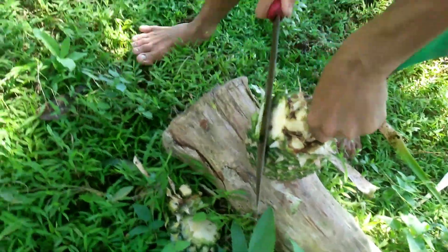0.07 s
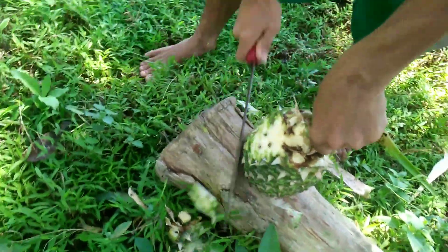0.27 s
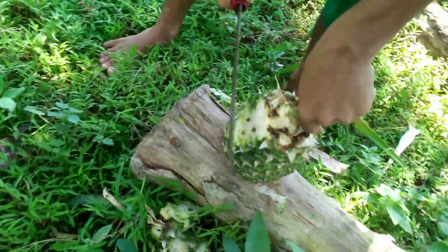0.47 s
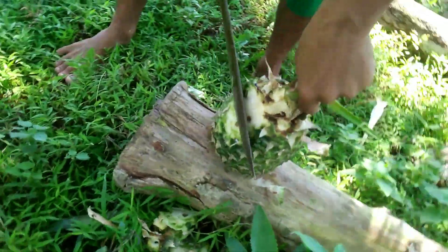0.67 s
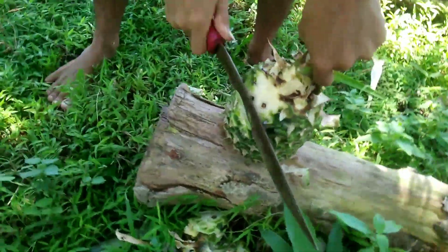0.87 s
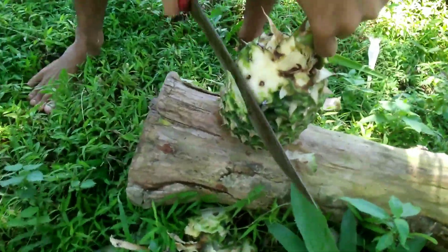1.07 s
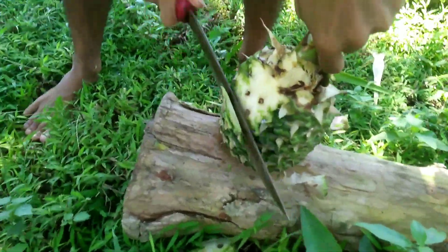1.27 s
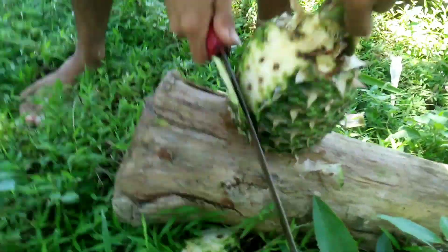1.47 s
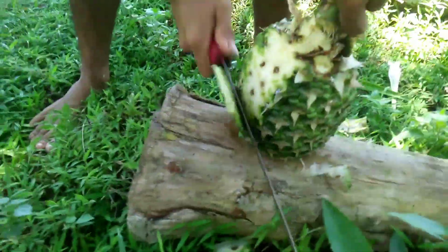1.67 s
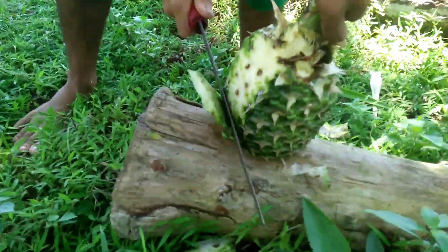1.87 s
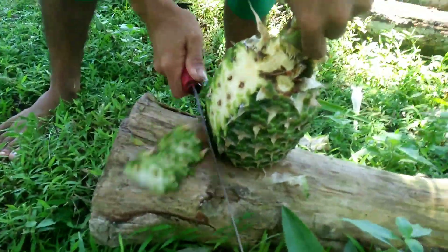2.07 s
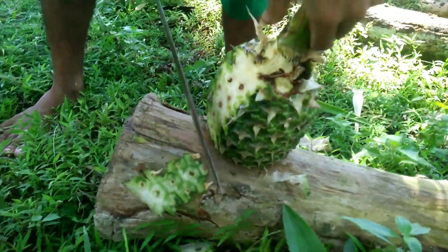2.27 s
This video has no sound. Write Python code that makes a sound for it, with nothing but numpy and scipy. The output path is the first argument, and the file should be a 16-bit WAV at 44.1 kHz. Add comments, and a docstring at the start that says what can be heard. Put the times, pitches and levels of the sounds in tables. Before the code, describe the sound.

Blade chopping and paring fibrous fruit rind on a wooden log, with crisp snaps and woody knocks

```python
"""Paring a pineapple with a machete

A machete pares the rind off a pineapple that stands on a log in the grass, close by.
The blade rasps through wet fibres (dense tiny clicks), snaps the tough ones (short bursts) and rings
faintly (fading tones). Twice it breaks through and chops into the log: a push, a bite, a thud, a crack
and ringing wood. Fainter knocks on the log, a soft rustle and a low rumble complete the scene."""
import sys
import numpy as np
from scipy import signal
from scipy.fft import rfft, irfft
from scipy.io import wavfile
from scipy.ndimage import uniform_filter1d

SR = 44100
rng = np.random.default_rng(int(sys.argv[2]) if len(sys.argv) > 2 else 0)


def output_pcm(signal):
    """Save a mono or channel-first signal as 16-bit PCM at the path in sys.argv[1].

    Samples are clipped to [-1, 1] before scaling.
    """
    pcm = np.clip(np.atleast_2d(signal).T, -1, 1) * 32767
    wavfile.write(sys.argv[1], SR, np.round(pcm).astype(np.int16))


N = 101429  # length in samples, about 2.3 s


def amp(db):
    """Turns decibels into a plain gain."""
    return 10 ** (np.asarray(db) / 20)


def unit(x):
    """Scales a sound to rms 1."""
    return x / np.sqrt(np.mean(x ** 2) + 1e-20)


def add(mix, s, sound):
    """Lays a sound into the mix, starting at s seconds."""
    part = mix[max(round(s * SR), 0):][:len(sound)]
    part += sound[:len(part)]


def colour(x, points, bump=lambda hz: 0):
    """Gives noise the spectrum drawn by the points, plus an optional bump in dB, at rms 1."""
    hz = np.fft.rfftfreq(len(x), 1 / SR) + 1  # + 1 avoids log(0)
    f, db = np.transpose(points)
    gain = amp(np.interp(np.log(hz), np.log(f), db) + bump(hz))
    return unit(irfft(rfft(x) * gain, len(x)))


def level_curve(points):
    """Draws a gain over the whole scene through (t/s, level/dB) points."""
    return amp(np.interp(np.arange(N) / SR, *np.transpose(points)))


FIBRES_PER_S, FIBRE_SPREAD_DB = 7000, 2.5


def fibres(count):
    """Dense tiny clicks of uneven size and random sign: fibres parting under the edge."""
    size = amp(FIBRE_SPREAD_DB * np.minimum(rng.exponential(1, count), 4))
    sign = rng.choice([-1, 1], count)
    return size * sign * (rng.random(count) < FIBRES_PER_S / SR)


# how loud the low rumble is over time: (t/s, level/dB)
RUMBLE_LEVEL = [(0, -70.5), (.13, -74), (.23, -52), (.33, -68), (.48, -65.5), (.57, -70.5), (.76, -67.5),
                (.87, -70), (.98, -61.5), (1.06, -65.5), (1.15, -62), (1.35, -76), (1.52, -68),
                (1.66, -78.5), (1.79, -66.5), (1.93, -77.5), (2.02, -68), (2.12, -72.5), (2.3, -72)]
# tone colour of the rumble: (f/Hz, level/dB)
RUMBLE_SPECTRUM = [(20, -19), (45, -6.5), (75, 0.5), (130, -1.5), (200, -15), (400, -32), (1500, -65.5)]


def rumble():
    """Low rumble at the microphone: deep noise that rises and falls."""
    return level_curve(RUMBLE_LEVEL) * colour(rng.standard_normal(N), RUMBLE_SPECTRUM)


# how loud the leaves and grass are over time: (t/s, level/dB)
RUSTLE_LEVEL = [(0, -61.5), (.17, -64.5), (.3, -54.5), (.56, -64), (1.0, -63), (1.37, -68.5), (1.59, -67),
                (1.65, -76.5), (1.72, -66), (1.87, -72), (1.98, -74.5), (2.09, -67), (2.14, -79),
                (2.19, -67.5), (2.3, -68.5)]
# tone colour of the rustle: (f/Hz, level/dB)
RUSTLE_SPECTRUM = [(100, -11), (500, -8.5), (1100, -9), (2200, -5), (3400, -4.5), (4800, 2), (5950, 2),
                   (6500, -12), (8000, -14.5), (12000, -15.5), (14500, -28.5)]


def rustle():
    """Soft rustle of leaves and grass: many tiny clicks blended with smooth noise."""
    grains = fibres(N) + .5 * rng.standard_normal(N)
    return level_curve(RUSTLE_LEVEL) * colour(grains, RUSTLE_SPECTRUM)


# blade or fruit meets the log:
# (t/s, level/dB, pitch factor, contact time/s, splinter crack level/dB, ring length factor)
CHOPS = [(.2408, -0.7, 1.0, .0001, -16, 1.0), (.5960, -53, .7, .0003, -12, 1.0),
         (.8600, -36, 1.04, .00014, -10, 1.1), (1.2995, -40, 1.65, .00028, -22, .8),
         (1.4280, -57, .54, .0005, -20, 1.0), (2.0356, -11, .935, .00021, -25, .8)]
# ways the log rings with the blade in it, before the factors of each chop:
# (f/Hz, level/dB, time to fade by 60 dB/s)
LOG_MODES = [(170, -29, .06), (250, -28, .08), (312, -23, .075), (428, -18, .06), (512, -6, .031),
             (653, -11, .042), (852, -25, .035), (1065, -21, .029), (1453, -4, .007), (1814, -22, .023),
             (2230, -13, .022), (2476, -13, .009), (2946, -16, .012), (4267, -26, .05)]
# tone colour of cracking wood: (f/Hz, level/dB)
CRACK_SPECTRUM = [(200, -13.5), (700, -7.5), (1100, -1.5), (1650, -5.5), (2300, 0), (3300, -6),
                  (4200, -5.5), (5800, -7), (7000, -10.5), (10000, -16.5), (14500, -36.5)]
PUSH_S, PUSH_DB = .000346, -4  # the width is divided by the pitch factor
BITE_DELAY_S, BITE_DB = .00035, -8
THUD_HZ, THUD_DB, THUD_PEAK_S = 78, -31.5, .0073
BUILD_CYCLES = 1.6  # each ring swells over about this many cycles of its unscaled pitch
CRACK_RISE_S, CRACK_DECAY_S = .0003, .003
SPLINTER_DB, SPLINTER_DECAY_S = -16, .012  # weaker, longer tail of the crack


def pulse(u):
    """A single push with a dip on either side, as the wood gives and springs back."""
    return (1 - u ** 2) * np.exp(-u ** 2 / 2)


def log_ring(after, pitch, contact, length):
    """The log's modes swell and die away; a longer contact excites the high ones less."""
    ring = 0
    for hz, level, t60 in LOG_MODES:
        decay = amp(level - 60 * after / (t60 * length))
        softness = 1 + (2 * hz * contact) ** 2
        build = 1 - np.exp(-(after * hz / BUILD_CYCLES) ** 2)
        ring = ring + decay / softness * np.cos(2 * np.pi * hz * pitch * after) * build
    return ring


def chops():
    """Each blow pushes the log, bites into it, thuds on the ground, and leaves wood ringing and cracking."""
    out = np.zeros(N)
    t = np.arange(-SR // 200, SR // 5) / SR  # starts 5 ms early, to hold the front of the push
    after = np.maximum(t, 0)
    for s, db, pitch, contact, crack_db, length in CHOPS:
        push = amp(PUSH_DB) * pulse(t * pitch / PUSH_S)
        bite = amp(BITE_DB) * pulse((t - BITE_DELAY_S) / contact)
        swell = np.exp(-(after / THUD_PEAK_S - 1) ** 2)
        thud = amp(THUD_DB) * np.sin(2 * np.pi * THUD_HZ * after) * swell
        ring = log_ring(after, pitch, contact, length)
        fade = np.exp(-after / CRACK_DECAY_S) + amp(SPLINTER_DB) * np.exp(-after / SPLINTER_DECAY_S)
        fade *= np.minimum(after / CRACK_RISE_S, 1)
        crack = amp(crack_db) * fade * colour(rng.standard_normal(len(t)), CRACK_SPECTRUM)
        add(out, s + t[0], amp(db) * (push + bite + thud + ring + crack))
    return out


# bundles of rind fibre snap:
# (t/s, level/dB, rise/s, decay/s, centre f/Hz, blade ring level against the tear/dB)
SNAPS = [(.2110, -28.5, 0.0004, 0.0045, 3430, -26), (.2180, -19, 0.00035, 0.0044, 3760, -22),
         (0.2234, -36, 0.0005, 0.012, 4400, -14), (0.312, -48, 0.00064, 0.0035, 3730, -19),
         (0.344, -42, .0008, 0.0047, 3780, -25), (0.462, -43, .003, 0.006, 5000, -20),
         (0.4864, -43.5, .0005, 0.0026, 4840, -7.5), (0.5042, -41, .0005, .003, 4880, -30.5),
         (0.7691, -54.5, 0.00075, 0.0029, 4220, -31), (0.8344, -45.5, .002, 0.0028, 4200, -13.5),
         (0.869, -62.5, 0.0018, 0.01, 4800, 5.5), (.9300, -55.5, 0.00051, 0.0057, 5740, 14.5),
         (0.964, -47, 0.0012, 0.0093, 5200, -7), (.9790, -41, 0.0037, 0.0067, 5630, -1),
         (.9855, -32.5, 0.00052, 0.0042, 5370, -12.5), (0.9946, -22, 0.00091, 0.00084, 5600, -36),
         (0.9979, -38, .001, 0.0029, 5570, -14), (1.0010, -33, 0.00014, 0.0012, 5600, -17),
         (1.02, -48.5, 0.00067, .002, 4740, -25), (1.1202, -29.5, 0.00036, 0.0011, 5400, -32),
         (1.122, -42, 0.00058, 0.004, 5130, -39), (1.1452, -34.5, .0004, .002, 5500, -31),
         (1.1809, -47, 0.00053, 0.0057, 4650, -30), (1.2025, -51, .0005, .002, 3800, -16),
         (1.2415, -68, .001, .003, 4570, -25), (1.281, -48, 0.0035, 0.018, 4900, -30.5),
         (1.297, -41.5, .0005, 0.0034, 5030, -29), (1.3892, -54, 0.00051, 0.0054, 5070, -27),
         (1.7450, -51, 0.0015, 0.0043, 4246, -28), (1.8291, -46.5, 0.00054, .002, 4510, -33),
         (2.0138, -48.5, 0.0028, 0.0043, 4720, -24), (2.0285, -35, 0.0061, 0.008, 4860, -25)]
# tone colour of a snap, before the peak at its centre: (f/Hz, level/dB)
SNAP_SPECTRUM = [(100, -13), (500, -11.5), (1100, -7.5), (1900, -11), (2700, -1.5), (5000, -3.5),
                 (6300, -3), (7200, -8.5), (10000, -11.5), (12000, -17.5), (14500, -24)]
# ways the steel blade rings: (f/Hz, level against each other/dB, time to fade by 60 dB/s)
BLADE_MODES = [(6030, -15.5, 0.014), (7970, -7.5, .022), (9880, 2.5, 0.024), (13100, 0, .025),
               (14150, -2.5, .02)]
PEAK_DB, PEAK_OCTAVES = 9, .34  # height and width of the peak at the centre frequency
TAIL_DB, TAIL_DECAY_S = -27.5, .012
SNAP_HISS = .4  # smooth noise among the single fibres


def snaps():
    """A bundle of fibres tears in a short burst and makes the steel blade ring."""
    out, t = np.zeros(N), np.arange(SR // 10) / SR
    steel = sum(amp(db - 60 * t / t60) * np.sin(2 * np.pi * hz * t) for hz, db, t60 in BLADE_MODES)
    for s, db, rise, decay, centre, ring_db in SNAPS:
        def peak(hz):
            """Lifts the frequencies near the centre of this snap, in dB."""
            return PEAK_DB * np.exp(-.5 * (np.log2(hz / centre) / PEAK_OCTAVES) ** 2)

        late = np.maximum(t - rise, 0)
        shape = np.exp(-late / decay) + amp(TAIL_DB) * np.exp(-late / TAIL_DECAY_S)
        shape *= np.minimum(t / rise, 1)
        grains = fibres(len(t)) + SNAP_HISS * rng.standard_normal(len(t))
        tear = shape * colour(grains, SNAP_SPECTRUM, peak)
        ring = unit(signal.fftconvolve(tear, steel)[:len(t)])
        strength = amp(db) * np.sqrt(np.mean(shape ** 2))  # a shorter burst carries less energy
        add(out, s, strength * (unit(tear) + amp(ring_db) * ring))
    return out


# slicing strokes:
# (start t/s, length/s, mid-stroke level/dB, swell over the stroke/dB, spray level against the rasp/dB)
STROKES = [(0, 0.028, -57, -20, -5.5), (0.017, 0.077, -61.5, -4.5, -15), (0.196, 0.023, -47, 22, -5),
           (0.316, 0.064, -54, 6.5, -6.5), (0.384, 0.12, -51.5, 4.5, -2.5), (0.583, 0.15, -59, -3, -10.5),
           (0.763, 0.025, -53.5, -12, -24.5), (0.825, 0.016, -47, 1.5, -13.5), (0.85, 0.12, -64, 5, -5),
           (0.985, 0.085, -57, -11, -7.5), (1.08, 0.041, -57.5, -13.5, -14),
           (1.115, 0.064, -54.5, -2.5, -7), (1.168, 0.089, -51, -8, -8.5), (1.273, 0.082, -59, -11, -12.5),
           (1.382, 0.099, -62, 2.5, -12), (1.544, 0.063, -67.5, -5, -10.5), (1.731, 0.077, -60.5, 1, -7),
           (1.825, 0.097, -71, -12, -7.5), (2.001, 0.044, -55.5, 8, -5)]
# tone colour of the rasping edge: (f/Hz, level/dB)
RASP_SPECTRUM = [(150, -12), (600, -14.5), (1300, -11.5), (2100, -10), (3300, -6.5), (4200, -5.5),
                 (5000, 1), (5800, -10.5), (6800, -17), (9000, -32), (14500, -34.5)]
# tone colour of the fine wet spray: (f/Hz, level/dB)
SPRAY_SPECTRUM = [(150, -35), (4500, -24), (7000, 0.5), (9000, 1), (11500, 0), (13000, -10.5), (14500, -9)]
STROKE_RISE_S, STROKE_FADE_S = .011, .008
GRAB_DB, GRAB_S = 1.17, .004  # typical swing of the grip, and how long it is smoothed
CRACKLES_PER_S, CRACKLE_DB, CRACKLE_SPREAD_DB, CRACKLE_DECAY_S = 320, -11, 3, .0005


def crackles():
    """Coarser crackles: sparse bursts of noise of uneven size that die away fast."""
    size = amp(CRACKLE_SPREAD_DB * np.minimum(rng.exponential(1, N), 2))
    clicks = (rng.random(N) < CRACKLES_PER_S / SR) * size
    bursts = signal.lfilter([1], [1, -np.exp(-1 / (CRACKLE_DECAY_S * SR))], clicks)
    return amp(CRACKLE_DB) * colour(bursts * rng.standard_normal(N), SNAP_SPECTRUM)


def slicing():
    """The edge grabs and slips through the rind: a rasp with crackles and a fine wet spray on top."""
    t, body, fine = np.arange(N) / SR, np.zeros(N), np.zeros(N)
    for start, length, db, swell_db, spray_db in STROKES:
        age = t - start
        effort = amp(db + swell_db * (np.clip(age / length, 0, 1) - .5))
        effort *= np.clip(age / STROKE_RISE_S, 0, 1)
        effort *= np.exp(-np.maximum(age - length, 0) / STROKE_FADE_S)
        body = np.hypot(body, effort)  # overlapping strokes add as energy
        fine = np.hypot(fine, effort * amp(spray_db))
    grab = unit(uniform_filter1d(rng.standard_normal(N), max(int(GRAB_S * SR), 1)))
    rasp = body * (colour(fibres(N), RASP_SPECTRUM) + crackles())
    spray = fine * colour(fibres(N), SPRAY_SPECTRUM)
    return amp(GRAB_DB * grab) * (rasp + spray)


SCATTER_DB, SCATTER_T60_S = -23.5, .068


def scatter(x):
    """Brief, weak reflections from the ground and plants: random echoes that fade quickly."""
    t = np.arange(SR // 4) / SR
    echoes = rng.standard_normal(len(t)) * (rng.random(len(t)) < 2000 / SR)  # about 2000 per second
    echoes *= (t > .004) * amp(-60 * t / SCATTER_T60_S)  # none in the first 4 ms
    return x + amp(SCATTER_DB) * signal.fftconvolve(x, echoes / np.linalg.norm(echoes))[:N]


def scene():
    """Cutting close by, in the open air, over the rustle and rumble."""
    cutting = scatter(chops() + snaps() + slicing())
    return (cutting + rustle() + rumble())[None]


LOW_CUT_HZ, TOP_EDGE_HZ = 52, 14350


def record(dry):
    """The microphone's low cut and the recorder's band limit."""
    low_cut = signal.butter(2, LOW_CUT_HZ, "high", fs=SR, output="sos")
    thin = signal.sosfilt(low_cut, dry)
    band_limit = signal.firwin(255, TOP_EDGE_HZ, window=("kaiser", 8), fs=SR)
    return signal.oaconvolve(thin, band_limit[None], "same")


dry = scene()
out = record(dry)
output_pcm(out)
```